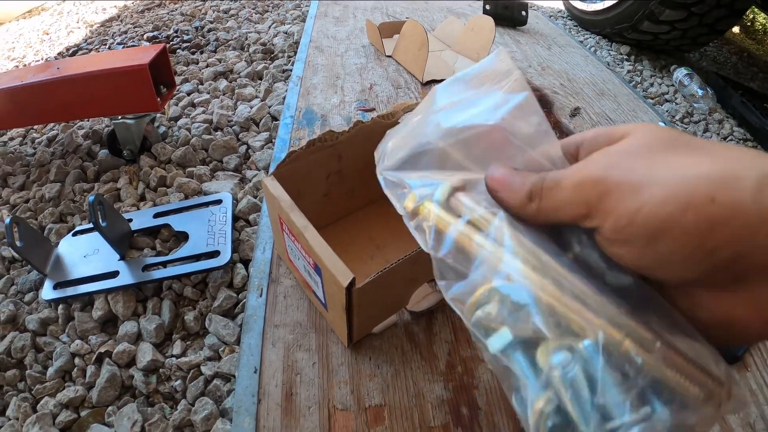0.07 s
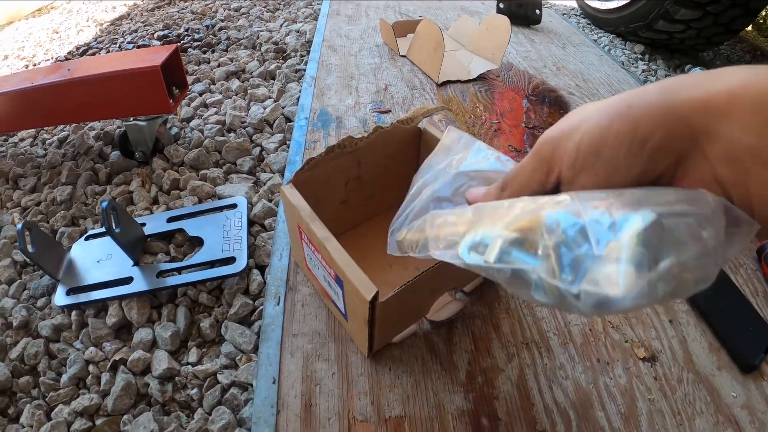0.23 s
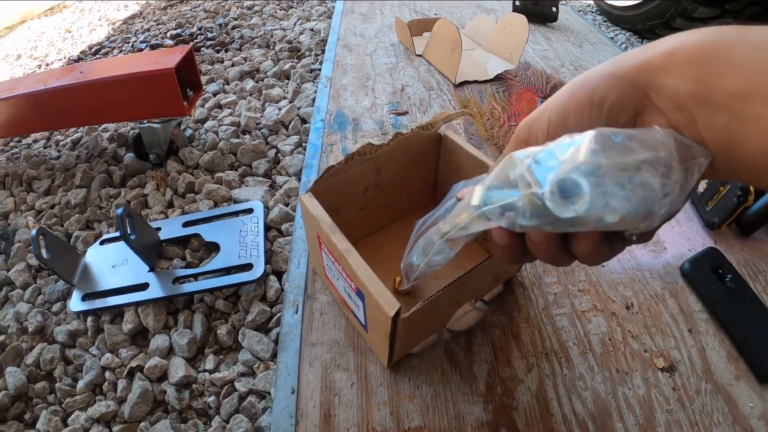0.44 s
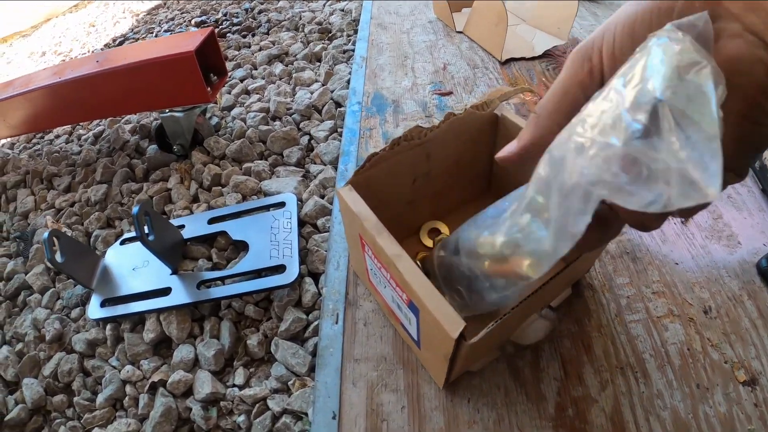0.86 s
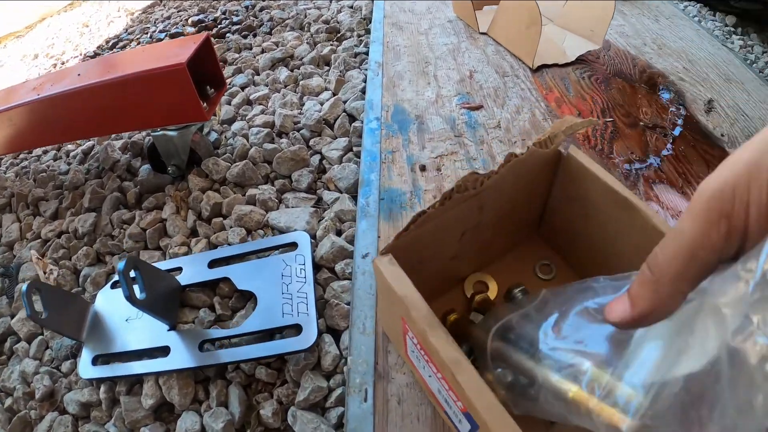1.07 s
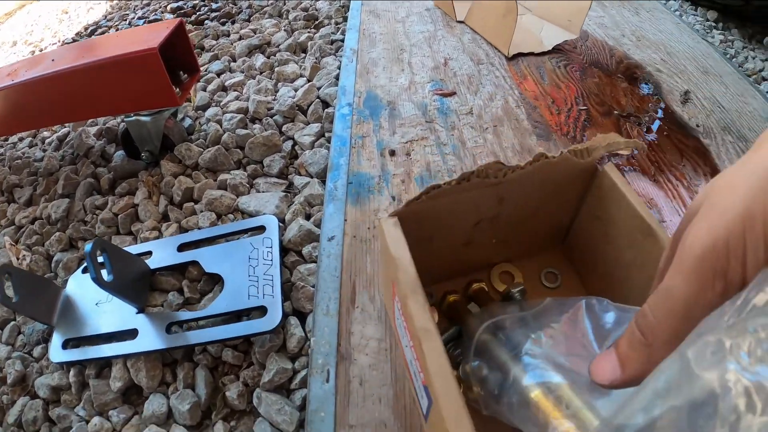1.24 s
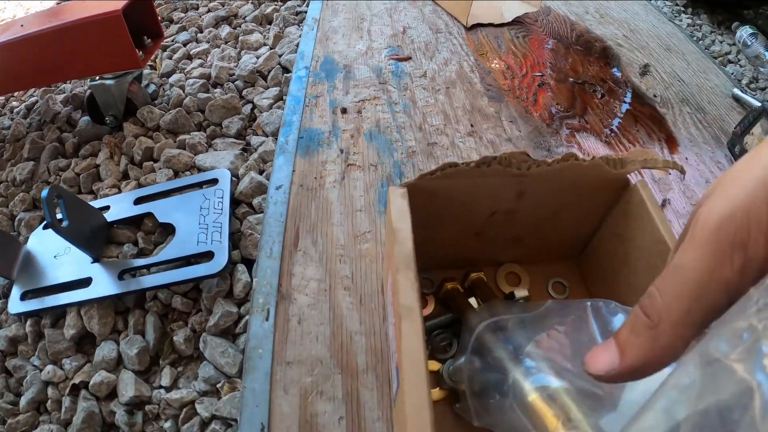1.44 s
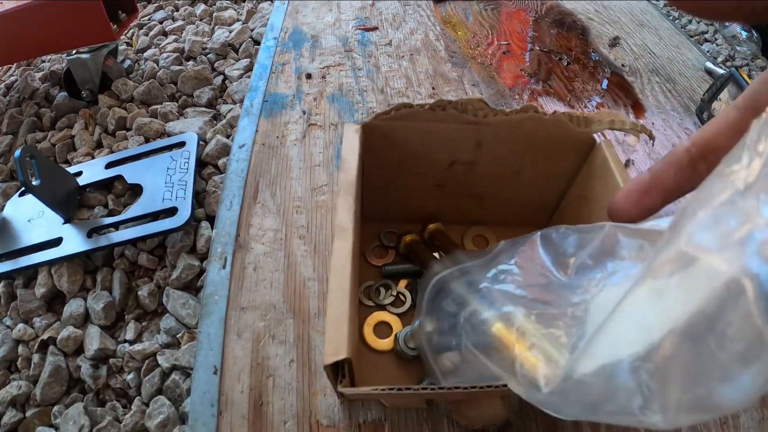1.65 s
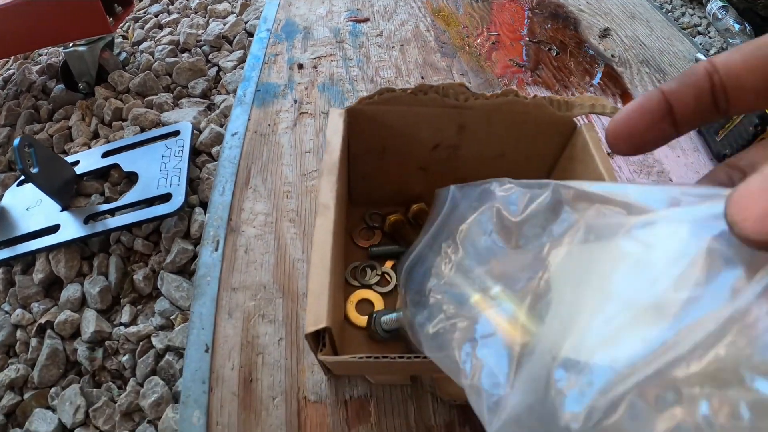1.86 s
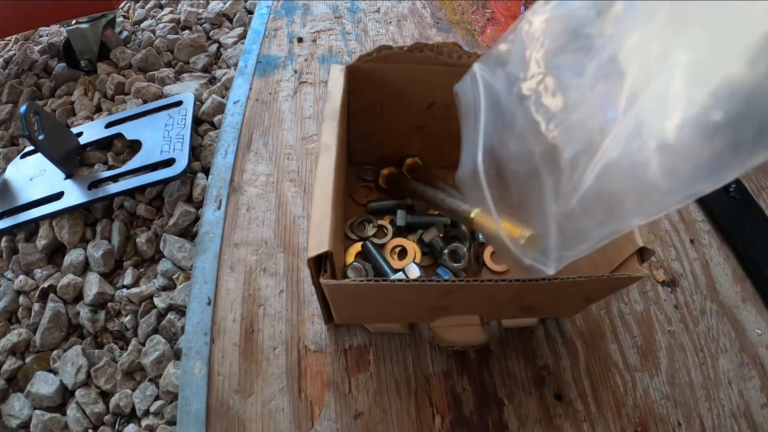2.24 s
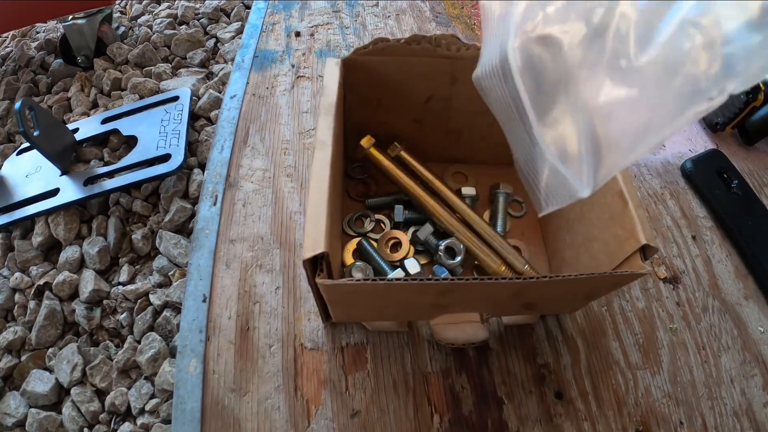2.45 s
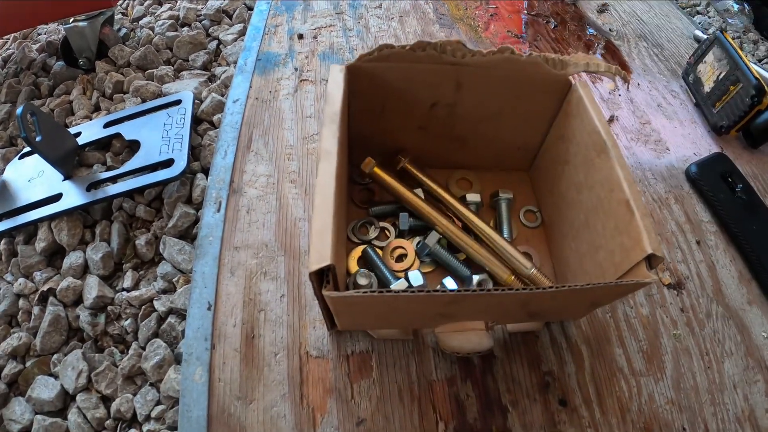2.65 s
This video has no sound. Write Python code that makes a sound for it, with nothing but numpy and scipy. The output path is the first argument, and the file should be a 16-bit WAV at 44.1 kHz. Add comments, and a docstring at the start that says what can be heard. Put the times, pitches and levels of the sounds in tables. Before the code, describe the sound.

Metal bolts, nuts and washers clink into a cardboard box from a crinkling plastic bag.

```python
"""Hardware tipped into a cardboard box.

Bolts, nuts and washers leave a plastic bag, outdoors and close by. Long steel bolts clink, rub
and ring in their bending modes; landings thump the box floor and ring its walls. Small parts tick
and tumble out in two rushes. The bag crinkles and snaps throughout, over a low rumble of moving air."""
import sys
import numpy as np
from scipy import signal
from scipy.fft import rfft, irfft, next_fast_len
from scipy.io import wavfile
from scipy.ndimage import uniform_filter1d

SR = 44100
rng = np.random.default_rng(int(sys.argv[2]) if len(sys.argv) > 2 else 0)


def master_out(mix):
    """Clip the mix to full scale and print it as 16-bit PCM to the path in sys.argv[1]."""
    frames = np.transpose(np.atleast_2d(mix))
    ceiling = np.clip(frames, -1, 1)
    pcm = np.round(ceiling * 32767).astype(np.int16)
    wavfile.write(sys.argv[1], SR, pcm)


N = 119070

# bolt bending modes: pitch_hz, level_db, t60_s
BOLT_MODES = [(2261, 0, .75), (5862, 0, .6), (10790, 0, .35), (13210, -11, .3)]
# bolt on bolt: start_s, first_mode_db, second_mode_db, upper_modes_db, undamped_s
BOLT_CLINKS = [(0.284, -49, -13.5, -36, 0.0038), (0.341, -35, -19.5, -41, 0.038),
               (.422, -13, -21, -37.5, 0.14), (0.462, -46, -14, -56, 0.007),
               (0.498, -44, -18.5, -65, 0.034), (.672, -29, -31.5, -27.5, 0.031),
               (0.841, -58, -21.5, -29.5, 0.0044), (2.273, -33, -27.5, -71, 0.051),
               (2.325, -61, -23.5, -32, 0.048), (2.366, -44, -20.5, -35, 0.17),
               (2.461, -66, -26, -32, 0.041)]
# thread on thread: start_s, end_s, first_mode_db, second_mode_db
BOLT_RUBS = [(0.074, 0.236, -47.5, -60), (0.216, 0.74, -36.5, -32.5), (0.747, 0.92, -59, -34),
             (2.195, 2.622, -57, -45)]
# rubbed modes relative to the second: third_mode_db, fourth_mode_db
RUB_UPPER_DB = [-18, -26]
# landings on cardboard: start_s, knock_db, thump_db, spot_hz
LANDINGS = [(0.4139, -6.5, -8, 785), (0.4192, -18.5, 2.5, 400), (0.498, -9, -9, 560),
            (0.598, -12, -38.5, 674), (.727, -7.5, -40, 910), (.744, -14.5, -17, 348),
            (0.769, -16.5, -17, 360), (0.85, -10, -6.5, 970), (.926, -14.5, -27, 610),
            (1.708, -22, -26, 580), (1.841, -16, -25, 520), (2.189, -10, -21, 1140), (2.255, -9, -46, 850),
            (2.290, -6, -17, 855), (2.325, -12, -14, 1000), (2.352, -17, -16, 755), (2.374, -9.5, -14, 700),
            (2.401, -8.5, -9.5, 656), (2.427, -14.5, -17, 730), (2.459, -12.5, -16.5, 750),
            (2.483, -16, -23, 790), (2.528, -20.5, -36, 750), (2.619, -22.5, -27.5, 810)]
# box floor modes: pitch_hz, level_db, t60_s
BOX_FLOOR_MODES = [(91.7, -12, 0.43), (129.3, -2.5, 0.02), (222, -5.5, 0.071), (340.3, -14, 0.077)]
# box wall modes: pitch_hz, level_db
BOX_WALL_MODES = [(340, 7.5), (395, 3), (520, -8), (665, -5.5), (770, -6.5), (970, -8), (1130, -11.5)]
# rolling on the box floor: start_s, end_s, level_db
FLOOR_ROLLS = [(.44, .94, -26), (2.32, 2.43, -21)]
# nuts and washers colliding: start_s, level_db
PART_TICKS = [(.623, -21.5), (.6794, -30), (.7275, -16), (.7412, -19.5), (.7605, -16.5), (.768, -19),
              (.845, -15.5), (.8892, -21), (1.07, -27.5), (1.4233, -18), (2.3269, -18.5), (2.355, -18),
              (2.455, -21), (2.528, -24)]
# tumbling envelope: time_s, level_db
TUMBLE_LEVELS = [(0, -50.5), (.3, -37), (.70, -39.5), (.76, -20.5), (.86, -28.5), (.98, -31.5), (1.14, -34),
                 (1.23, -52.5), (1.42, -31.5), (1.52, -29), (1.60, -50.5), (1.94, -32), (2.08, -43.5),
                 (2.3, -33), (2.39, -23), (2.5, -35.5), (2.68, -52.5)]
# scuffed cardboard spectrum: freq_hz, gain_db
CARDBOARD_SPECTRUM = [(40, -37), (140, -1), (470, -2.5), (590, 4.5), (740, 3.5), (1000, 0.5), (2000, -6.5),
                      (12000, -91)]
# bag snaps: start_s, level_db
BAG_SNAPS = [(0.193, -25.5), (0.262, -20), (.3437, -20.5), (0.4143, -16.5), (0.9314, -19.5), (1.0002, -24),
             (1.1196, -16.5), (1.1329, -19.5), (1.2522, -20), (1.2619, -29.5), (1.3635, -24), (1.4775, -23),
             (1.5208, -13.5), (1.6253, -28), (1.778, -18.5), (1.799, -12.5), (1.821, -22.5), (1.8951, -18),
             (1.917, -16.5), (1.926, -20), (1.9354, -13.5), (1.9565, -23), (1.9719, -17), (1.9829, -21),
             (2.0707, -20), (2.1889, -16.5), (2.4014, -13.5)]
# snap and tick spectrum before tilt: freq_hz, gain_db
CRACK_SPECTRUM = [(200, 9.5), (600, 6), (1500, 16), (3400, 6.5), (5000, 2), (7000, -8.5), (10500, -26.5),
                  (16000, -44)]
# bag crinkle envelope: time_s, level_db
CRINKLE_LEVELS = [(0, -53.5), (.33, -28), (.47, -37), (.69, -32), (.77, -25.5), (.88, -28), (1.03, -41.5),
                  (1.14, -33.5), (1.23, -38), (1.42, -29.5), (1.52, -36), (1.59, -52.5), (1.70, -49),
                  (1.79, -38), (1.93, -31), (2.01, -40.5), (2.13, -42), (2.25, -38), (2.38, -28.5),
                  (2.5, -37.5), (2.68, -55.5)]
# bag crinkle spectrum: freq_hz, gain_db
CRINKLE_SPECTRUM = [(40, -25), (150, 7), (600, -0.5), (1500, 0.5), (3500, 3.5), (5000, -4.5), (10500, -19),
                    (16000, -29.5)]
# air rumble envelope: time_s, level_db
AIR_LEVELS = [(0, -32.5), (1.65, -34.5), (1.95, -29), (2.45, -26), (2.68, -41.5)]
# air rumble spectrum: freq_hz, gain_db
AIR_SPECTRUM = [(20, -14), (60, 0.5), (102, 3.5), (125, -2), (200, -7.5), (350, -24), (16000, -85)]
# out-of-phase share of the channels: freq_hz, side_to_mid_db
STEREO_SIDE = [(100, -50), (2500, -35.5), (13000, -6)]

RING_ATTACK_S = .002


def bolt_clinks(detune_hz=18, twin_ratio=.995, twin_db=-9, damped_t60_s=.085):
    """Two near-equal bolts ring until neighbours damp them; higher modes beat and detune per hit."""
    out, t = np.zeros(N), seconds(16384)
    for start_s, first_db, second_db, upper_db, undamped_s in BOLT_CLINKS:
        envelope = (1 - np.exp(-t / RING_ATTACK_S)) * fade(np.maximum(t - undamped_s, 0), damped_t60_s)
        hit_db = (first_db, second_db, upper_db, upper_db)
        for k, (hz, db, t60_s) in enumerate(BOLT_MODES):
            phase = 2 * np.pi * rng.random(2)
            pitch_hz = hz + (k > 0) * detune_hz * rng.uniform(-.96, 1)
            ring = np.sin(2 * np.pi * pitch_hz * t + phase[0])
            if k > 0:
                ring += undb(twin_db) * np.sin(2 * np.pi * pitch_hz * twin_ratio * t + phase[1])
            add(out, start_s, undb(hit_db[k] + db) * ring * fade(t, t60_s) * envelope)
    return out


def bolt_rubs(width_hz=16, catches_per_s=150):
    """Threads catch and keep re-striking the bolt modes."""
    first_hz, second_hz, *upper_hz = (mode[0] for mode in BOLT_MODES)
    low = sustained_modes([(first_hz, 0)], width_hz, catches_per_s)
    high = sustained_modes([(second_hz, 0), *zip(upper_hz, RUB_UPPER_DB)], width_hz, catches_per_s)
    low_gate = gate([(start_s, end_s, db) for start_s, end_s, db, _ in BOLT_RUBS])
    high_gate = gate([(start_s, end_s, db) for start_s, end_s, _, db in BOLT_RUBS])
    return low * low_gate + high * high_gate


def box_landings(wall_t60_s=.057, spot_width_oct=.27, scatter=.019, scuff_db=-12.5, scuff_t60_s=.052):
    """Each landing scuffs the cardboard, thumps the floor and rings wall modes near its spot's pitch."""
    out, t = np.zeros(N), seconds(12000)

    def ring(hz, t60_s):
        return np.sin(2 * np.pi * hz * (1 + scatter * rng.standard_normal()) * t) * fade(t, t60_s)

    for start_s, knock_db, thump_db, spot_hz in LANDINGS:
        scuff = unit_rms(colour(rng.standard_normal(len(t)), CARDBOARD_SPECTRUM)) * fade(t, scuff_t60_s)
        walls = floor = 0
        for k, (hz, db) in enumerate(BOX_WALL_MODES):
            coupling = np.exp(-np.log2(hz / spot_hz) ** 2 / (2 * spot_width_oct ** 2))
            walls += (-1) ** k * undb(db) * coupling * ring(hz, wall_t60_s)
        for k, (hz, db, t60_s) in enumerate(BOX_FLOOR_MODES):
            floor += (-1) ** k * undb(db) * ring(hz, t60_s)
        add(out, start_s, undb(knock_db) * (walls + undb(scuff_db) * scuff) + undb(thump_db) * floor)
    return out


def bolt_rolls():
    """Rolling bolts drum the box floor."""
    modes = [(hz, db) for hz, db, _ in BOX_FLOOR_MODES]
    return sustained_modes(modes, width_hz=28.3, nudges_per_s=130) * gate(FLOOR_ROLLS)


def part_ticks():
    """Nuts and washers strike each other in bright ticks."""
    return cracks(PART_TICKS, t60_s=.027, tilt_db_per_oct=8.5)


def part_tumble():
    """Small parts slide and tumble over cardboard in many dull contacts."""
    contacts = grains(rate_per_s=760, spread_db=1.5, t60_s=.019)
    return unit_rms(colour(contacts, CARDBOARD_SPECTRUM)) * gain_curve(TUMBLE_LEVELS)


def bag_snaps():
    """The plastic gives single sharp snaps."""
    return cracks(BAG_SNAPS, t60_s=.011, tilt_db_per_oct=0)


def bag_crinkle():
    """The plastic crinkles in dense, tiny bursts."""
    crinkles = grains(rate_per_s=1700, spread_db=3.6, t60_s=.010)
    return unit_rms(colour(crinkles, CRINKLE_SPECTRUM)) * gain_curve(CRINKLE_LEVELS)


def air_rumble():
    """Moving air makes low noise."""
    return unit_rms(colour(rng.standard_normal(N), AIR_SPECTRUM)) * gain_curve(AIR_LEVELS)


def sustained_modes(modes, width_hz, nudges_per_s):
    """Modes (pitch_hz, level_db) kept ringing by soft random nudges."""
    t = seconds(8192)
    nudges = np.sign(rng.standard_normal(N)) * (rng.random(N) < nudges_per_s / SR)
    envelope = (1 - np.exp(-t / RING_ATTACK_S)) * np.exp(-np.pi * width_hz * t)
    return sum(undb(db) * unit_rms(signal.fftconvolve(nudges, np.sin(2 * np.pi * hz * t) * envelope)[:N])
               for hz, db in modes)


def cracks(events, t60_s, tilt_db_per_oct, centre_hz=2933, attack_s=.0005, tail_db=-20, tail_t60_s=.055):
    """Short noise bursts, each with a slight pitch of its own and a faint tail from the box."""
    out, t = np.zeros(N), seconds(4096)
    envelope = (1 - np.exp(-t / attack_s)) * (fade(t, t60_s) + undb(tail_db) * fade(t, tail_t60_s))
    envelope /= envelope.max()
    envelope_rms = np.sqrt(np.mean(envelope ** 2))
    for start_s, db in events:
        pitch_hz = centre_hz * 2 ** (rng.random() - .5)
        burst = (rng.standard_normal(len(t)) + np.sin(2 * np.pi * pitch_hz * t) / 2) * envelope
        crack = unit_rms(colour(burst, CRACK_SPECTRUM, tilt_db_per_oct))
        add(out, start_s, undb(db) * envelope_rms * crack)
    return out


def grains(rate_per_s, spread_db, t60_s, bands=24, tries=600, top_hz=12000, top_tone_db=6):
    """Random tiny contacts of uneven size, each a burst of noise and tone."""
    out, t = np.zeros(N), seconds(1500)
    probability = rate_per_s * N / SR / (tries * bands)
    for hz in np.geomspace(500, top_hz, bands):
        pitch_hz = hz * np.exp(rng.standard_normal() / 20)
        tone = undb(top_tone_db) * np.sqrt(hz / top_hz) * np.sin(2 * np.pi * pitch_hz * t)
        burst = (rng.standard_normal(len(t)) + tone) * fade(t, t60_s)
        for position, chance, size_draw in rng.random((tries, 3)):
            if chance < probability:
                level_db = spread_db * min(-np.log(size_draw), 4.5)
                add(out, position * N / SR, burst * undb(level_db))
    return out


def colour(x, spectrum, tilt_db_per_oct=0, pivot_hz=2500):
    """Minimum-phase filter through (freq_hz, gain_db) points, with optional tilt."""
    size = next_fast_len(2 * len(x), real=True) // 2 * 2
    octave = np.log2(np.maximum(np.arange(size // 2 + 1) * SR / size, 1))
    hz, db = np.array(spectrum).T
    tilt_db = tilt_db_per_oct * np.maximum(octave - np.log2(pivot_hz), -2)
    gain = undb(np.interp(octave, np.log2(hz), db) + tilt_db)
    cepstrum = irfft(np.log(gain), size)
    cepstrum[1:size // 2] *= 2
    cepstrum[size // 2 + 1:] = 0
    return irfft(rfft(x, size) * np.exp(rfft(cepstrum)), size)[:len(x)]


def gate(spans):
    """Softly switched gain over (start_s, end_s, level_db) spans."""
    t = seconds(N)
    steps = sum(undb(db) * ((t > start_s) & (t < end_s)) for start_s, end_s, db in spans)
    return uniform_filter1d(steps, size=2500)


def gain_curve(points):
    """Gain along (time_s, level_db) points."""
    return undb(np.interp(seconds(N), *np.array(points).T))


def add(out, start_s, x):
    i = max(int(start_s * SR), 0)
    out[i:i + len(x)] += x[:N - i]


def fade(t, t60_s):
    return np.exp(-np.log(1000) * t / t60_s)


def undb(db):
    return 10 ** (np.asarray(db) / 20)


def unit_rms(x):
    return x / np.sqrt(np.mean(x ** 2))


def seconds(samples):
    return np.arange(samples) / SR


def scene():
    """All sources straight ahead; the channels differ only in phase, mainly in the treble."""
    mid = bag_crinkle() + part_tumble() + air_rumble()
    mid += bolt_clinks() + bolt_rubs() + bolt_rolls() + box_landings()
    mid += bag_snaps() + part_ticks()
    hz, db = np.array(STEREO_SIDE).T
    bin_hz = np.arange(N // 2 + 1) * SR / N
    lag_rad = np.arctan(undb(np.interp(np.log1p(bin_hz), np.log(hz), db)))
    return np.array([irfft(rfft(mid) * np.exp(1j * sign * lag_rad), N) for sign in (-1, 1)])


def record(dry, cutoff_hz=15500):
    """Steep low-pass on the top treble."""
    return signal.sosfilt(signal.ellip(8, .2, 80, cutoff_hz, fs=SR, output="sos"), dry)


dry = scene()
out = record(dry)
master_out(out)
```